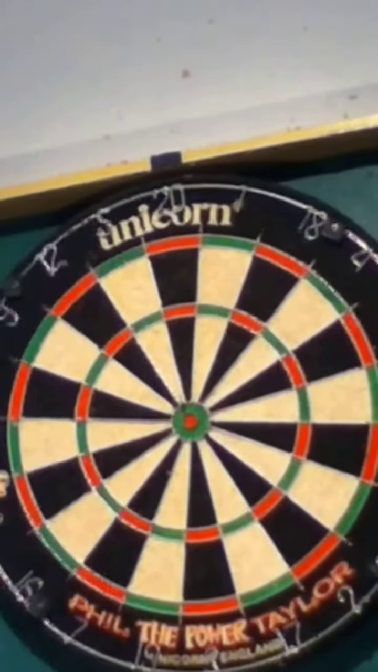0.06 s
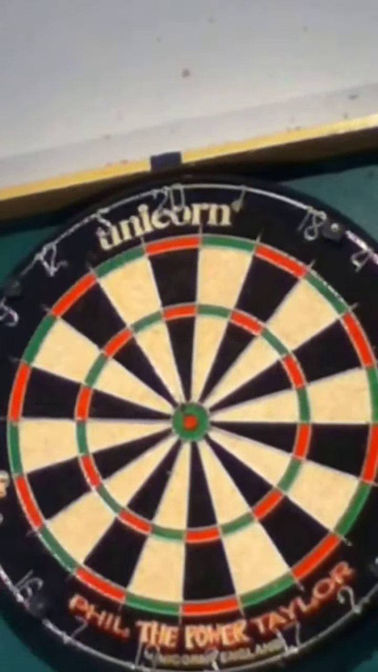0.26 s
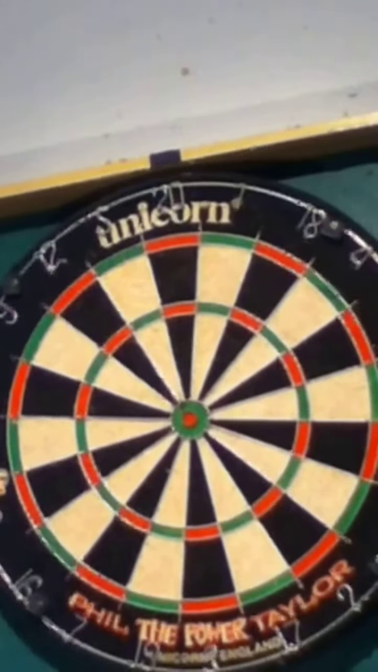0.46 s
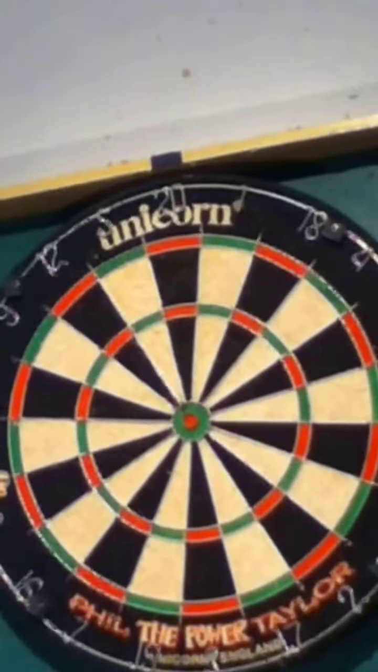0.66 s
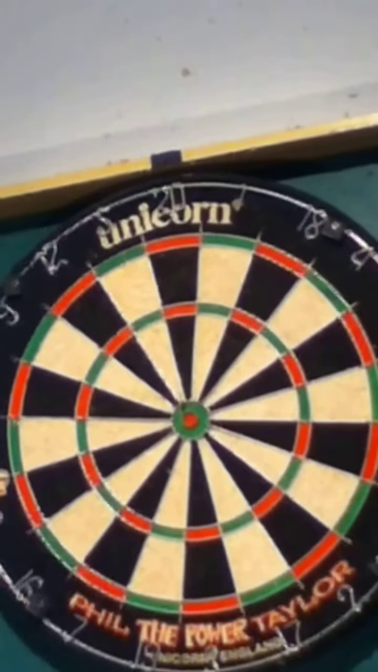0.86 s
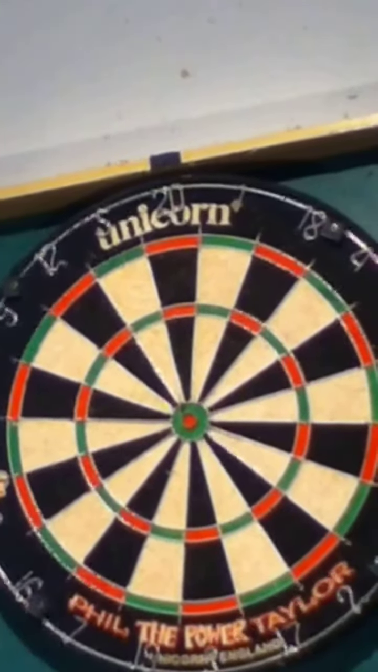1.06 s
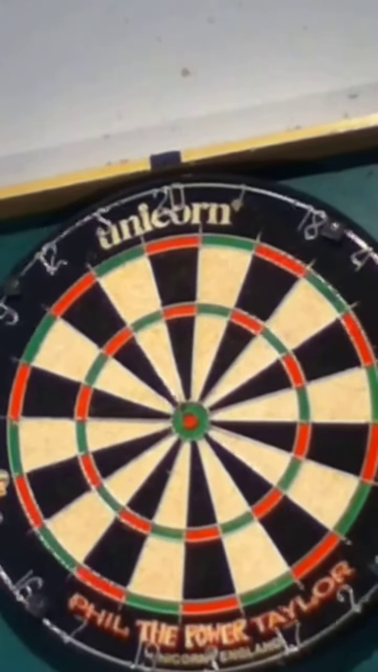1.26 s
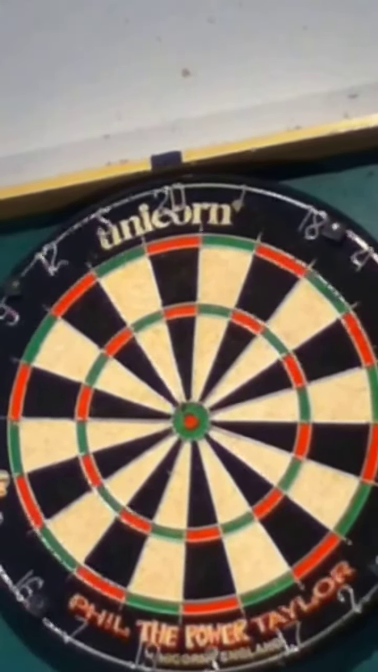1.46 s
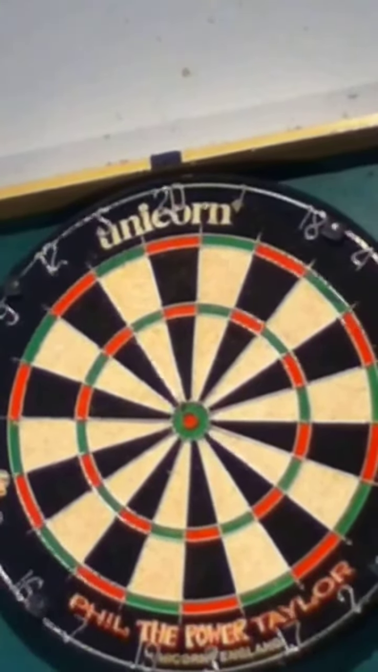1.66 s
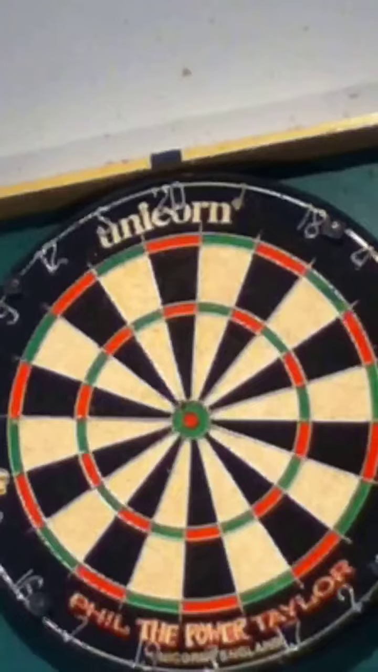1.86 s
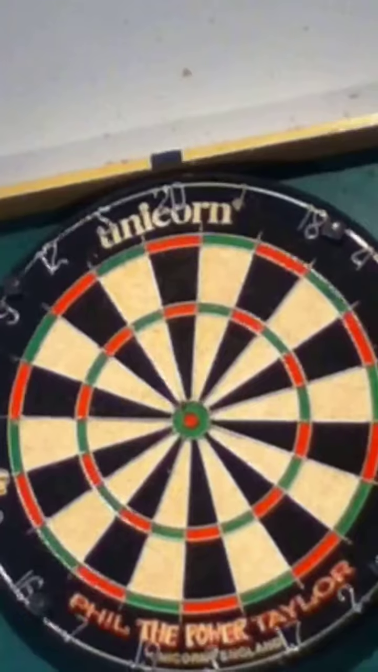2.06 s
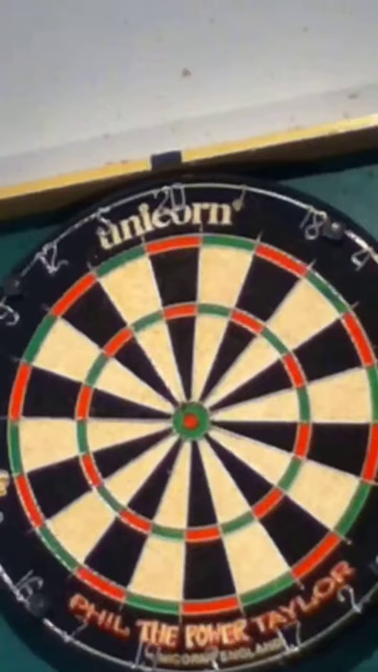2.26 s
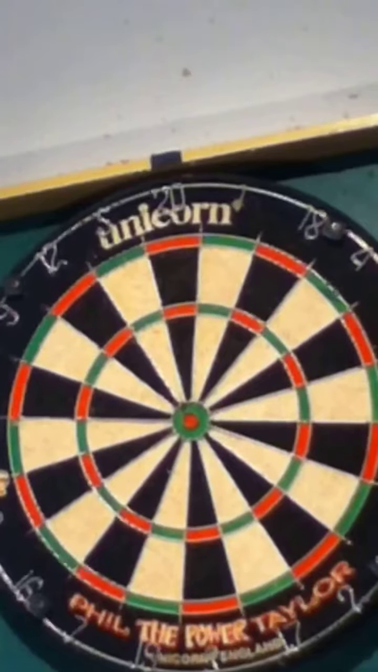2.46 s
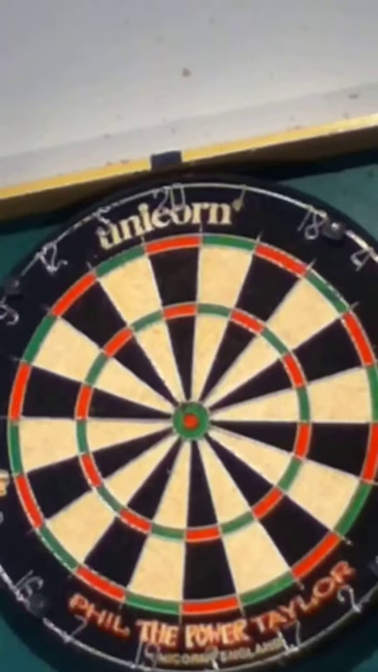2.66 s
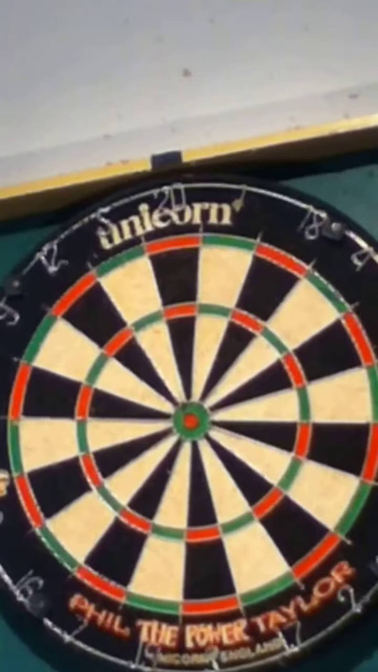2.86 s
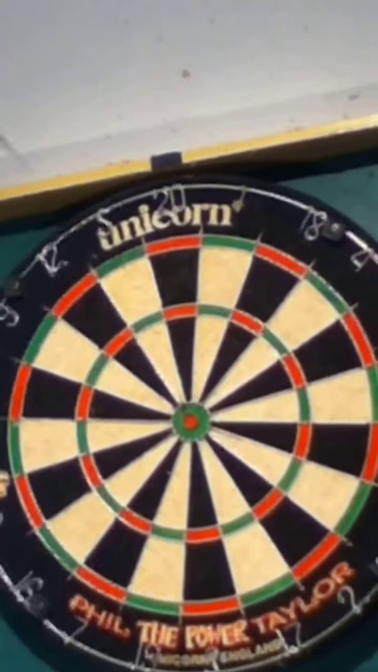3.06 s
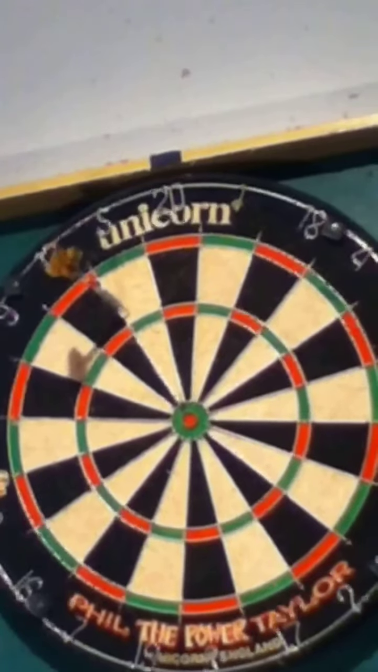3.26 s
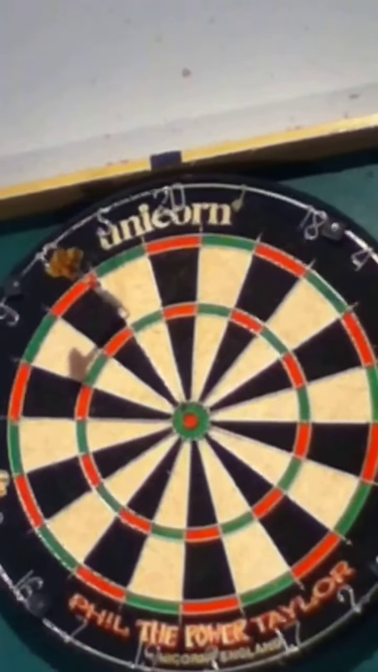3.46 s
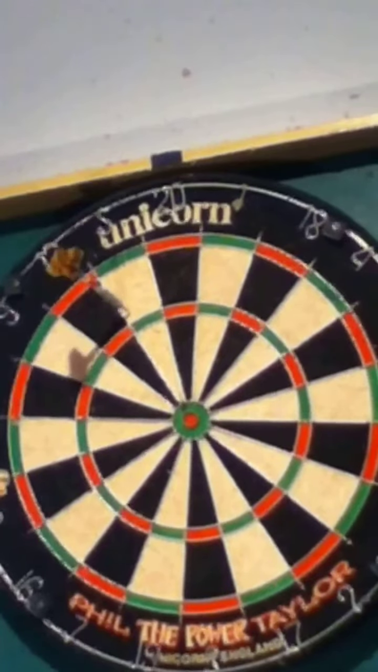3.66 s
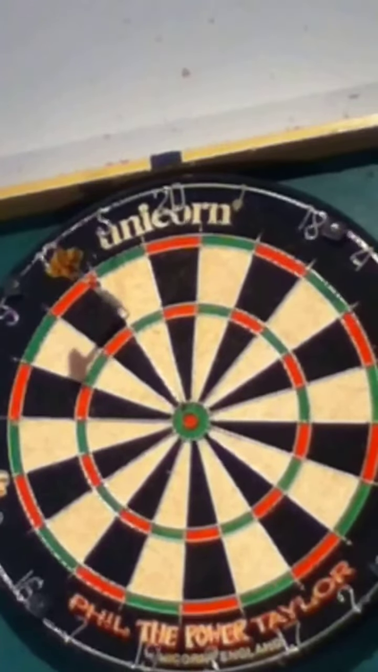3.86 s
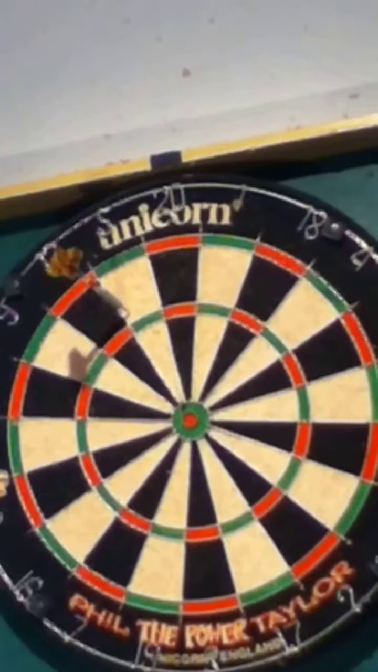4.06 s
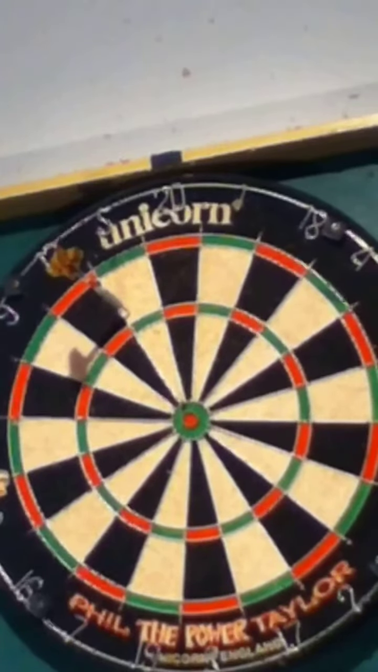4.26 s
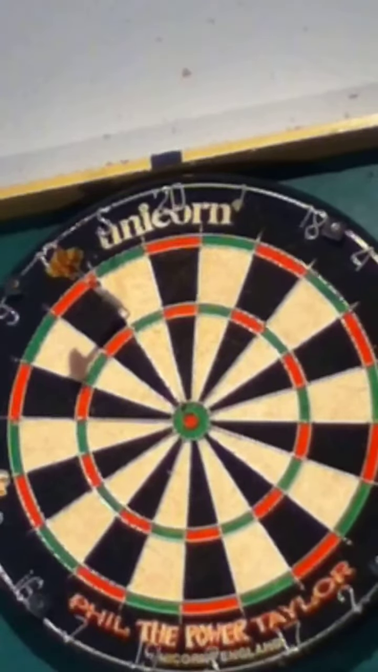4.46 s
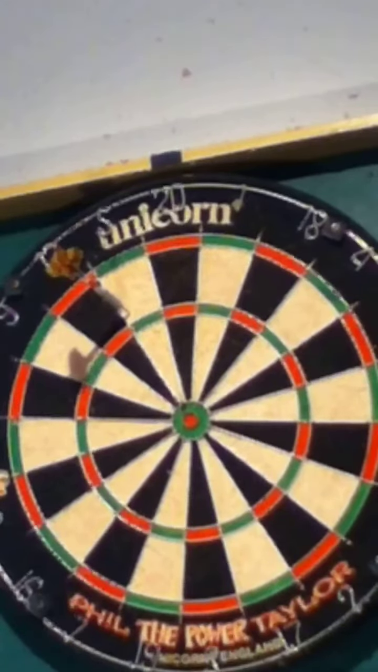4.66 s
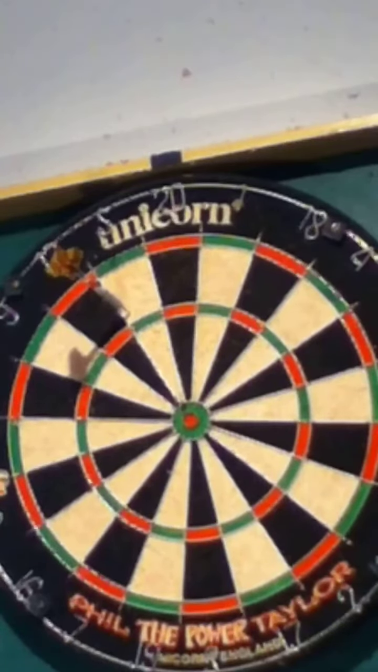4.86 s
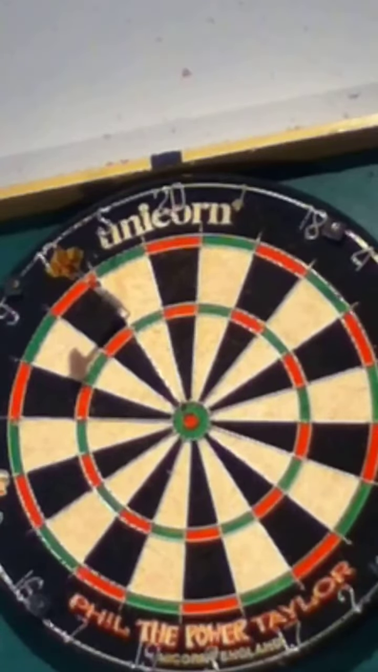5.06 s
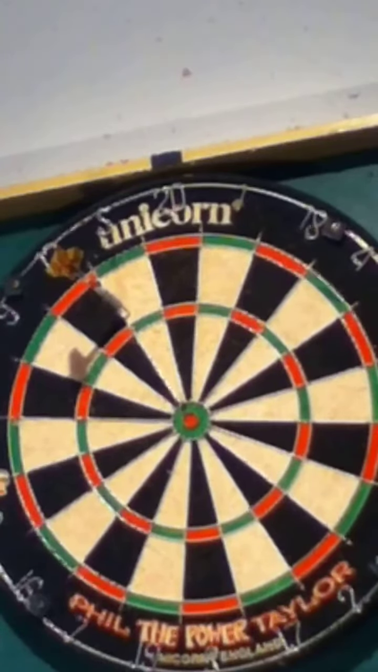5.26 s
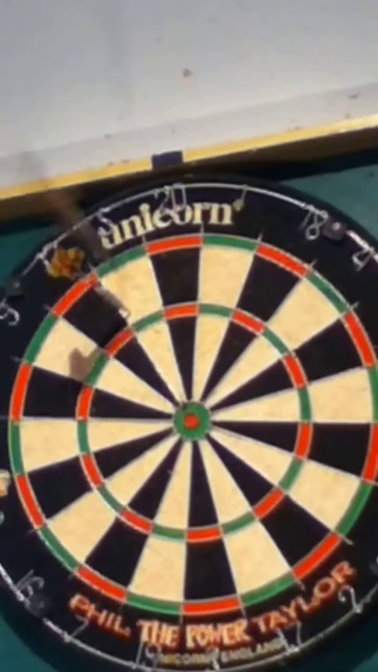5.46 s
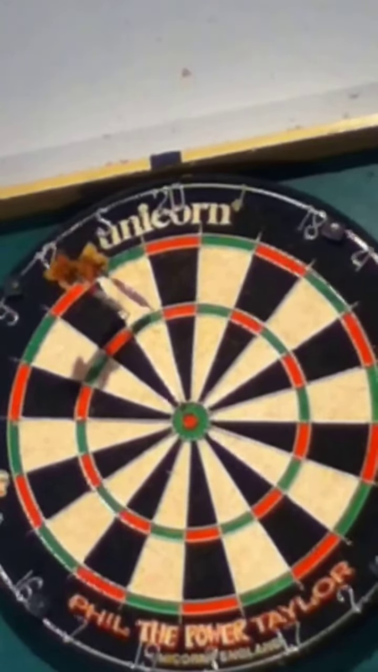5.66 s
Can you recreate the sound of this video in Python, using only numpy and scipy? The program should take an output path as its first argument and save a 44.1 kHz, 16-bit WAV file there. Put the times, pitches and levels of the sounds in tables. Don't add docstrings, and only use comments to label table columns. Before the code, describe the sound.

Footsteps scuff and thud on a hard floor, spare darts clink, then one dart thumps into a bristle board and another cracks in sharply.

```python
import sys
import numpy as np
from scipy import signal
from scipy.io import wavfile
from scipy.ndimage import uniform_filter1d

SR = 44100
rng = np.random.default_rng(int(sys.argv[2]) if len(sys.argv) > 2 else 0)


def file_out(sig):
    cols = np.atleast_2d(sig).T
    lim = np.clip(cols, -1, 1)
    pcm = np.round(lim * 32767).astype(np.int16)
    wavfile.write(sys.argv[1], SR, pcm)


def field_ratio(decibels):
    return 10 ** (np.asarray(decibels, dtype=float) / 20)


N = 252252
SPAN = SR // 3

# start_s, peak_db
FIBRE_TICKS = [
    (3.2585, -29),
    (3.2597, -27),
    (3.2611, -26),
    (3.2635, -28),
    (3.267, -30),
    (3.2705, -31),
]
# pitch_hz, width_hz, level_db
DART_SHAFT = [(1380, 350, 13.5), (2700, 560, 1.5), (4030, 1950, -3.5), (7560, 1900, -5.5),
              (8700, 1500, -4.5), (12700, 6600, -14.0)]
# pitch_hz, level_db, fade_60db_s
BOARD_MODES = [(255, -14, 0.48), (320, -7, 0.066), (446, -3, 0.089), (472, -15, 0.38), (699, -9.5, 0.15),
               (1140, -13, 0.05), (1440, -17, 0.033), (2060, -12, 0.048), (2620, -8.5, 0.033)]
# pitch_hz, level_db (per Hz)
THUMP_TAIL = [(150, -32), (250, -10), (350, -4.5), (466, 6.5), (555, -15), (702, -1), (1200, -9),
              (1560, -10.5), (2360, -21), (4400, -25.5), (6000, -32), (8000, -25), (10000, -38),
              (16500, -48)]
THUMP_S, THUMP_DB, THUMP_TAIL_DB, KNOCK_DB = 3.2626, -17.5, -24, -9.5

# pitch_hz, level_db, fade_60db_s
STRUCK_METAL = [(464.5, -15.5, 0.24), (1290, -8, 0.059), (1300, -11, 0.058), (1730, -12, 0.077),
                (2745, -2, 0.021), (3198, -9.5, 0.072), (4320, -14, 0.059), (4420, -1.5, 0.036),
                (6260, -13, 0.05), (6850, -1, 0.03), (8100, 0, .03), (9750, 2.5, 0.015)]
# pitch_hz, level_db (per Hz)
CRACK_TAIL = [(88, -49.5), (150, -40), (250, -4.5), (386, -13), (498, -4), (752, -13.5), (1280, -6),
              (2180, -8.5), (2810, -16), (3420, -11), (4330, -14), (5930, -15.5), (7660, -10.5),
              (15300, -30), (16500, -54)]
# pitch_hz, width_hz, level_db
LINGERING = [(1235, 140, 6.5), (2460, 720, -13), (3270, 270, -10), (4240, 850, 1.5), (7400, 970, -0.5),
             (9200, 800, -7)]
CRACK_S, CRACK_DB, CRACK_RATTLE_DB, CRACK_TAIL_DB, LINGERING_DB = 5.6139, -2.5, -12.5, -16.5, -20

# start_s, peak_db, room_tail_db, brightness_db
STEPS = [
    (0.2129, -26, -8, -1),
    (0.2145, -26, -5.5, -0.5),
    (1.291, -47.5, -3.5, -4),
    (1.4968, -31.5, -11, 2.5),
    (1.575, -41.5, -8.5, 1),
    (1.8207, -15, -15.5, 1),
    (2.0027, -13.5, -12, -1),
    (2.8913, -15.5, -13, -0.5),
    (5.5103, -14, -12.5, -1),
]
# pitch_hz, level_db (per Hz)
STEP_TAIL = [(35, -28), (76, -38), (100, -16), (216, -4.5), (266, -13.5), (328, -4.5), (615, -3),
             (808, -11), (1020, -9.5), (1150, -25), (1280, -12), (4410, -33.5), (9000, -46), (11700, -76),
             (19800, -120)]
# delay_s, level_db
STEP_ECHOES = [(.0037, -11), (.0065, -4), (.0098, -24), (.0122, -9)]
# pitch_hz, level_db, fade_60db_s
FLOOR_MODES = [(101, -3, 0.19), (142.6, -22, 0.24), (202.3, -7, 0.17), (316, -14, 0.16)]
# pitch_hz, level_db, fade_60db_s
FLOORBOARD = [(150.8, -3, 0.11), (312, -8.5, 0.075)]
FLOORBOARD_LAG_S = 0.0015
GRIT_SNAP_S, GRIT_SNAP_DB = 2.8908, -23.5

# start_s, level_db, hardness_db (per group),
# strike_point_db (even against odd groups), room_tail_db
CLINKS = [
    (.002, -41, -2, -0.5, 2),
    (.1288, -27, -4, -3, -7),
    (.1490, -24.5, 0.5, -0.5, -12),
    (.1592, -25, -0.5, -1, -17),
    (.19, -41.5, -4.5, 1.5, 0.5),
    (.46, -23, 2.5, -0.5, -22),
    (.464, -28, 4.2, -2, -8),
    (5.166, -41, -0.5, -0.5, -5.5),
    (5.6101, -37, 0.2, 2, -8),
]
# pitch_hz, width_hz, level_db
BARREL = [
    [(1562, 96, 11.5), (1880, 410, 3.5), (2950, 2800, -4)],
    [(3740, 850, -4.5), (4296, 350, 10), (4850, 1350, -1)],
    [(6740, 720, 6.5), (7640, 470, 2)],
    [(8370, 350, 5), (9000, 700, -2.5), (12700, 9000, -12.5)],
]
PICKS = [
    (2.81, -44.8, 4, -2.9, 0),
    (3.092, -38.5, -1, -4, 4.5),
    (3.097, -37, 0, 2.5, -11),
    (3.5845, -24, 4, -1.3, -2),
]
# pitch_hz, width_hz, level_db
PICKED = [
    [(1529, 70, 14.5), (1745, 120, 11), (1903, 60, 15.5), (2600, 820, -14)],
    [(3380, 230, -1.7), (3940, 1200, 0.43)],
    [(5030, 870, -3), (5550, 330, 4.5)],
    [(7100, 800, -8), (7760, 530, -1), (8570, 690, -10)],
]
# delay_s, level_db
CLINK_ECHOES = [(.0048, -10.5), (.0082, -16.5), (0.0122, -22.5)]

# time_s, pressure_db
SCUFF = [
    (.2, -55),
    (.25, -47),
    (.36, -48),
    (.44, -51.5),
    (.5, -44.5),
    (.66, -47),
    (.81, -51.5),
    (.86, -64),
    (.93, -70),
]
# pitch_hz, level_db (per Hz)
RUB = [(300, -14), (430, 0.5), (600, -3), (800, -4.5), (1100, -8), (1600, -13.5), (2500, -14)]
GRIT = [(1000, -3.5), (1700, -2), (3000, 0), (5000, -8.5), (7000, -56)]
CLOTH = [(4000, -13), (5500, -4), (6900, 10), (8500, -4.5), (13000, -14)]
MEAN_PRESSURE_DB = -48
RUB_DB, RUB_FOLLOWS = -49, 0.97
GRIT_DB, GRIT_FOLLOWS = -48.5, 1.015
CLOTH_DB, CLOTH_FOLLOWS = -57, 0.6
BRUSH_S, BRUSH_WIDTH_S, BRUSH_DB = 0.385, 0.07, 10

# middle_s, length_s, level_db, pitch_hz
RUSTLES = [
    (0.023, 0.1, -60, 920),
    (.16, 0.1, -52, 580),
    (3.102, 0.06, -59, 1020),
    (1.105, 0.13, -59, 2500),
    (1.1, .1, -58.5, 557),
    (2.812, .06, -60, 6900),
    (2.974, 0.21, -64, 8000),
    (5.175, 0.08, -56.5, 6860),
    (5.363, 0.17, -57, 7750),
    (5.386, 0.13, -60, 1380),
]
# pitch_hz, level_db (per Hz)
HISS = [(12, -56), (20, -41), (32, 10.5), (59, -2), (116, -1.5), (202, -1.5), (283, -6), (407, -10),
        (523, -10.5), (691, -13.5), (840, -14), (993, -15), (6250, -19), (10600, -20.5), (15700, -26.5)]
HISS_DB = -53.5
# pitch_hz, fade_60db_s
ROOM = [(80, 0.54), (250, 0.34), (600, 0.22), (2000, 0.23), (6000, 0.25), (10000, 0.17), (16000, .19)]

EDGES = np.r_[22 * 2 ** np.arange(0, 9.4, 1 / 3), 16600]
BANK = [signal.butter(2, pair, "band", fs=SR, output="sos") for pair in zip(EDGES, EDGES[1:])]
CENTRES = np.sqrt(EDGES[1:] * EDGES[:-1])


def rms_one(x):
    return x / np.sqrt(np.mean(x ** 2) + 1e-20)


def at_hz(points, hz):
    table_hz, values = np.transpose(points)
    return np.interp(np.log(hz), np.log(table_hz), values)


def bands(size):
    settle = 2000
    white = rng.standard_normal((2, size + settle))
    return np.array([signal.sosfilt(sos, white[k % 2])[settle:] for k, sos in enumerate(BANK)])


def colour(spectrum):
    inside = (CENTRES > spectrum[0][0]) & (CENTRES < spectrum[-1][0])
    gains = field_ratio(at_hz(spectrum, CENTRES)) * inside
    power = np.sum(gains ** 2 * np.diff(EDGES)) * 2 / SR
    return gains / np.sqrt(power)


def decay(rise_s, t60):
    t = np.arange(SPAN) / SR
    return (1 - np.exp(-(t / rise_s) ** 2)) * field_ratio(-60 * t / t60)


def tail(gains, rise_s):
    fade_s = at_hz(ROOM, CENTRES)[:, None]
    return gains @ (bands(SPAN) * decay(rise_s, fade_s))


def push(hz, turns):
    t = np.arange(SPAN) / SR
    window = np.sin(np.pi * np.clip(t * hz / turns, 0, 1)) ** 2
    return np.sin(2 * np.pi * hz * t) * window


def modes(table, spread_db):
    t = np.arange(SPAN) / SR
    out = 0
    for hz, db, t60 in table:
        level = field_ratio(db + spread_db * rng.normal() - 60 * t / t60)
        out = out + level * np.sin(2 * np.pi * hz * t)
    return out


def resonate(x, peaks):
    out = 0
    for k, (hz, width, db) in enumerate(peaks):
        r = np.exp(-np.pi * width / SR)
        b = (1 - r * r) / 2 * np.array([1, 0, -1])
        a = [1, -2 * r * np.cos(2 * np.pi * hz / SR), r * r]
        rung = signal.lfilter(b, a, signal.lfilter(b, a, x))
        out = out + (-1) ** k * field_ratio(db) * rung
    return out


def echoed(x, echoes):
    out = x
    for s, db in echoes:
        late = np.r_[np.zeros(round(s * SR)), x][:len(x)]
        out = out + field_ratio(db) * late
    return out


def add(track, s, sound):
    i = round(s * SR)
    track[i:i + len(sound)] += sound[:N - i]


def first_dart():
    out = np.zeros(N)
    for s, db in FIBRE_TICKS:
        tick = rng.standard_normal(SPAN) * decay(0.0001, 0.009)
        add(out, s, field_ratio(db + 6.0) * resonate(tick, DART_SHAFT))
    thump = modes(BOARD_MODES, spread_db=2.0) * decay(0.00044, 6.5)
    add(out, THUMP_S, -field_ratio(KNOCK_DB) * push(hz=1000, turns=1.5))
    add(out, THUMP_S + 0.00226, field_ratio(THUMP_DB) * thump)
    add(out, THUMP_S, field_ratio(THUMP_TAIL_DB) * tail(colour(THUMP_TAIL), 0.016))
    return signal.sosfilt(signal.butter(3, 225, "high", fs=SR, output="sos"), out)


def second_dart():
    out = np.zeros(N)
    rattle = modes(STRUCK_METAL, spread_db=-0.5) * decay(0.0021, 9.0)
    hanging_on = resonate(rng.standard_normal(SPAN) * decay(0.0015, 0.23), LINGERING)
    add(out, CRACK_S, field_ratio(CRACK_DB) * push(hz=8870, turns=3.6))
    add(out, CRACK_S, field_ratio(CRACK_DB - 14) * push(hz=15400, turns=12.5))
    add(out, CRACK_S, field_ratio(CRACK_RATTLE_DB) * echoed(rattle, CLINK_ECHOES))
    add(out, CRACK_S, field_ratio(CRACK_TAIL_DB) * tail(colour(CRACK_TAIL), 0.001))
    add(out, CRACK_S, field_ratio(LINGERING_DB + 9.5) * hanging_on)
    return out


def footfalls():
    out = np.zeros(N)
    heel = echoed(push(hz=351, turns=0.97), STEP_ECHOES)
    slap = echoed(push(hz=1240, turns=4.6), STEP_ECHOES)
    for s, db, tail_db, bright_db in STEPS:
        tilt = field_ratio(bright_db * np.log2(CENTRES / 400) / 2)
        boom = modes(FLOOR_MODES, spread_db=1.8) * decay(0.039, 11.0)
        room = field_ratio(tail_db) * tail(colour(STEP_TAIL) * tilt, 0.0035)
        add(out, s, field_ratio(db) * (heel + boom + room))
        add(out, s + FLOORBOARD_LAG_S, -field_ratio(db - 10.0) * modes(FLOORBOARD, spread_db=0.0))
        add(out, s + 0.00524, field_ratio(db + bright_db - 26) * slap)
    add(out, GRIT_SNAP_S, field_ratio(GRIT_SNAP_DB) * push(hz=4300, turns=1.5))
    return signal.sosfilt(signal.butter(2, 70, "high", fs=SR, output="sos"), out)


def clinks(events, barrel, t60, edge_db):
    out, group = np.zeros(N), np.arange(len(barrel))
    tick = echoed(push(hz=8750, turns=0.6), CLINK_ECHOES)
    edge = resonate(tick, [(5470, 2700, 0)])
    for s, db, hard_db, point_db, tail_db in events:
        group_db = db + hard_db * (group - group.mean()) + point_db * (-1) ** group
        room = field_ratio(tail_db - 23.0) * rng.standard_normal(SPAN) * decay(0.002, t60)
        rung = sum(field_ratio(g) * resonate(tick + room, peaks) for g, peaks in zip(group_db, barrel))
        add(out, s, field_ratio(15.5) * rung + field_ratio(max(group_db) + edge_db) * edge)
    return out


def scuff():
    s, pressure_db = np.transpose(SCUFF)
    start, size = round(s[0] * SR), round((s[-1] - s[0]) * SR)
    t = (start + np.arange(size)) / SR
    noise, out = bands(size), np.zeros(N)
    grain = field_ratio(0.45 * rms_one(uniform_filter1d(rng.standard_normal(size), size=300)))
    swing = np.interp(t, s, pressure_db) - MEAN_PRESSURE_DB
    brush = BRUSH_DB * np.exp(-((t - BRUSH_S) / BRUSH_WIDTH_S) ** 2)
    rub = field_ratio(RUB_DB + RUB_FOLLOWS * swing) * (colour(RUB) @ noise)
    grit = field_ratio(GRIT_DB + GRIT_FOLLOWS * swing) * (colour(GRIT) @ noise)
    cloth = field_ratio(CLOTH_DB + CLOTH_FOLLOWS * swing + brush) * (colour(CLOTH) @ noise)
    add(out, s[0], (rub + grit + cloth) * grain * signal.windows.tukey(size, 0.1))
    return out


def rustles():
    out = np.zeros(N)
    for s, length, db, hz in RUSTLES:
        size = round(length * SR)
        noise = rms_one(resonate(rng.standard_normal(SPAN), [(hz, hz * 1.13, 0)]))
        add(out, max(s - length / 2, 0), field_ratio(db) * noise[:size] * np.hanning(size))
    return out


def microphone_hiss():
    return field_ratio(HISS_DB) * (colour(HISS) @ bands(N))


def scene():
    mono = first_dart() + second_dart() + footfalls()
    mono += clinks(CLINKS, BARREL, t60=0.31, edge_db=-4)
    mono += clinks(PICKS, PICKED, t60=0.23, edge_db=6)
    mono += scuff() + rustles() + microphone_hiss()
    return np.array([mono, mono])


def band_limit(x):
    return signal.sosfilt(signal.butter(12, 16650, fs=SR, output="sos"), x)


def record(dry):
    heard = signal.sosfilt(signal.butter(3, 69.4, "high", fs=SR, output="sos"), dry)
    heard = signal.sosfilt(signal.ellip(6, 0.5, 15, 15880, fs=SR, output="sos"), heard)
    heard = signal.sosfilt(signal.cheby2(16, 80, 16800, fs=SR, output="sos"), heard)
    return band_limit(heard)


dry = scene()
out = record(dry)
file_out(out)
```